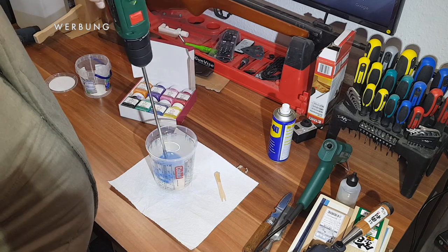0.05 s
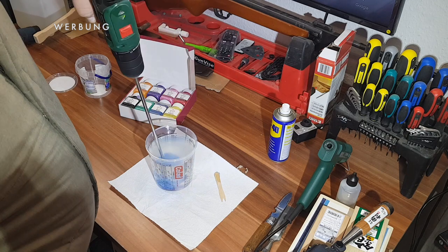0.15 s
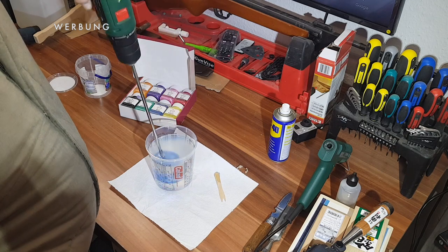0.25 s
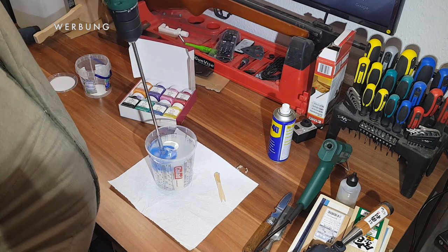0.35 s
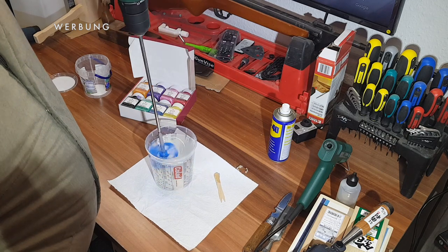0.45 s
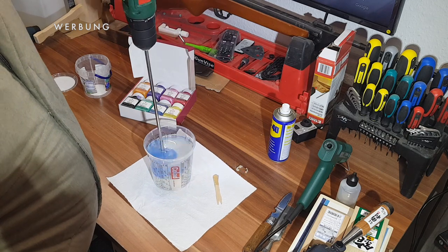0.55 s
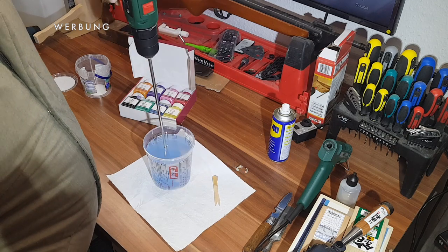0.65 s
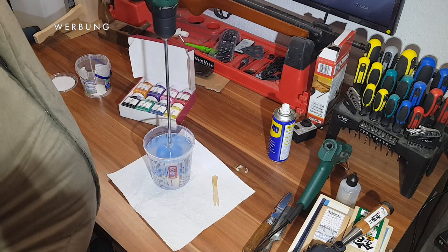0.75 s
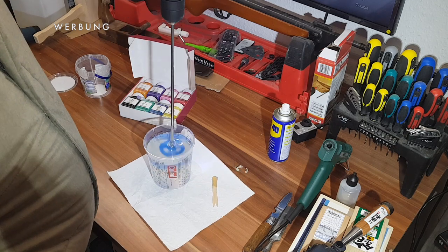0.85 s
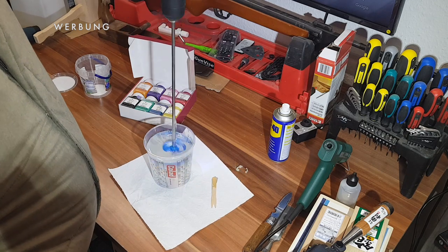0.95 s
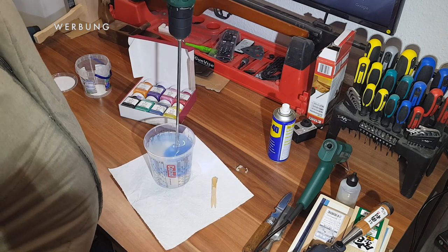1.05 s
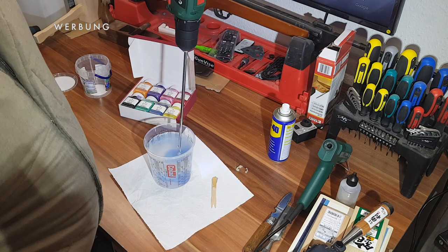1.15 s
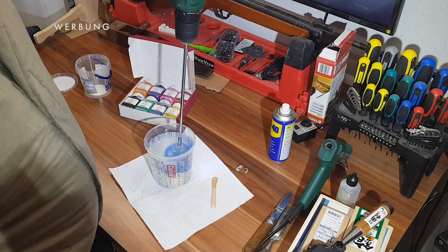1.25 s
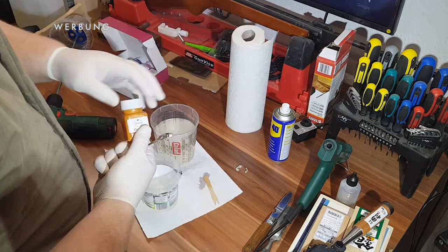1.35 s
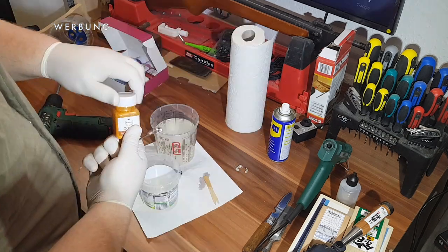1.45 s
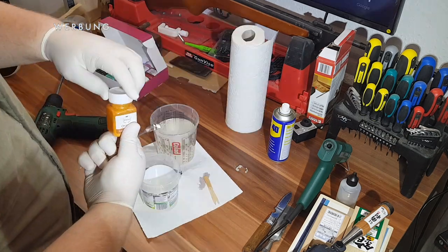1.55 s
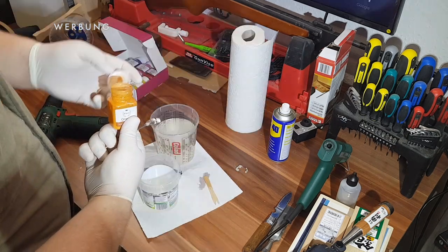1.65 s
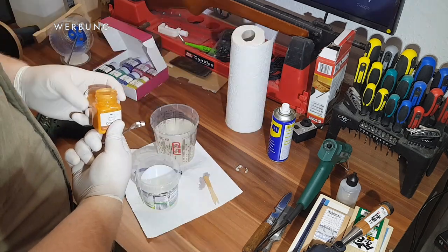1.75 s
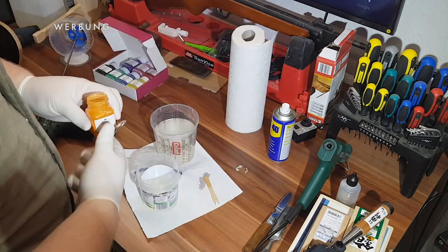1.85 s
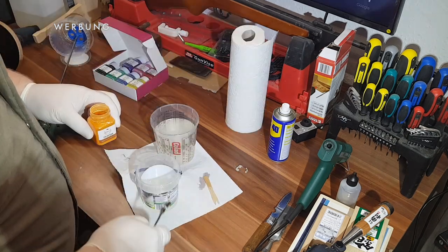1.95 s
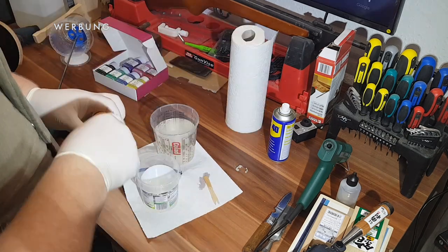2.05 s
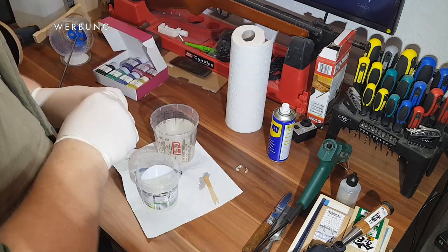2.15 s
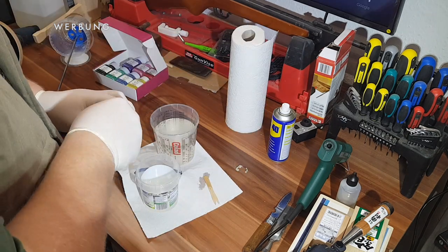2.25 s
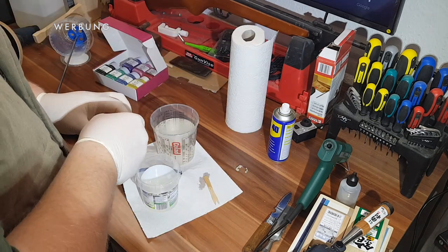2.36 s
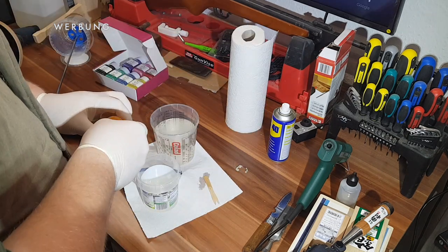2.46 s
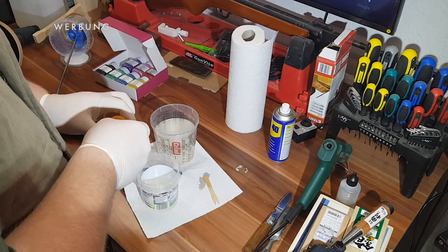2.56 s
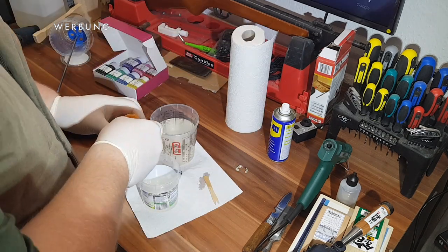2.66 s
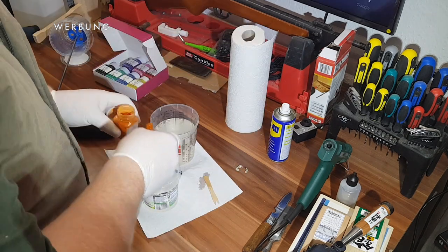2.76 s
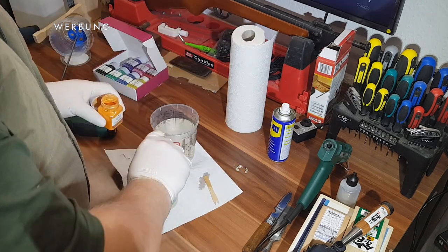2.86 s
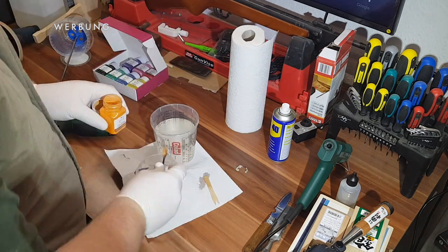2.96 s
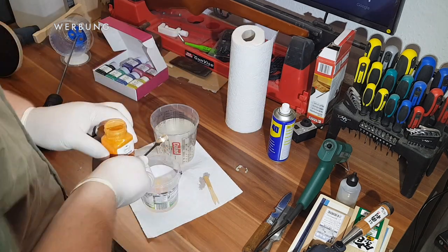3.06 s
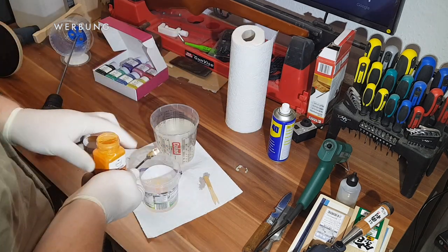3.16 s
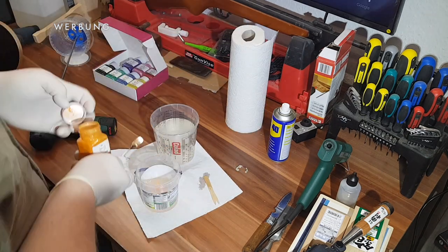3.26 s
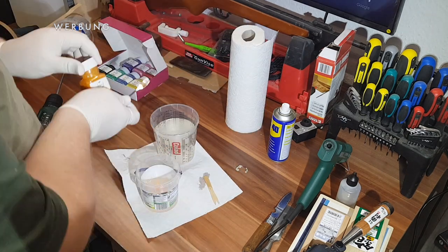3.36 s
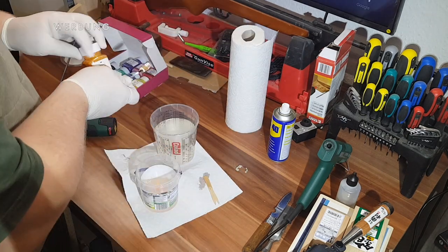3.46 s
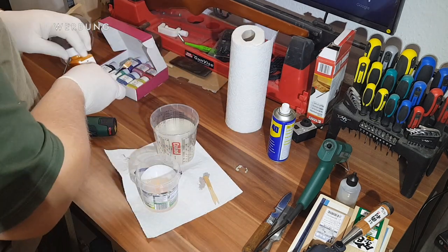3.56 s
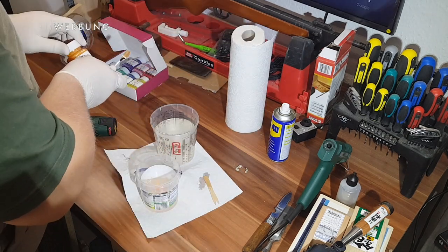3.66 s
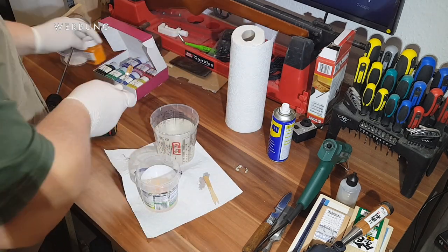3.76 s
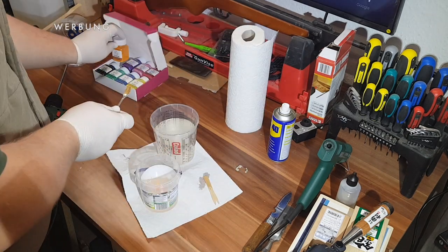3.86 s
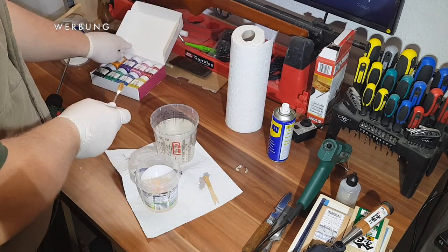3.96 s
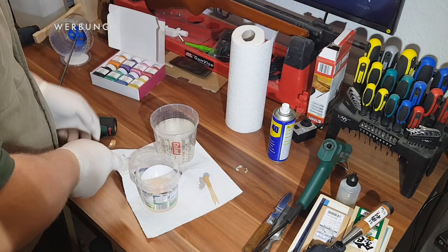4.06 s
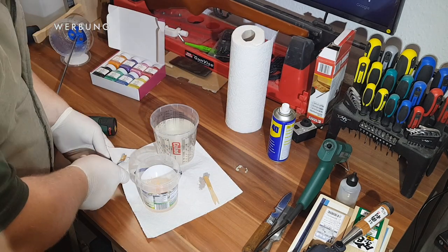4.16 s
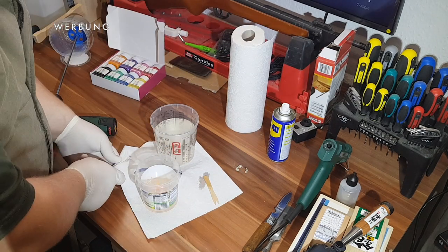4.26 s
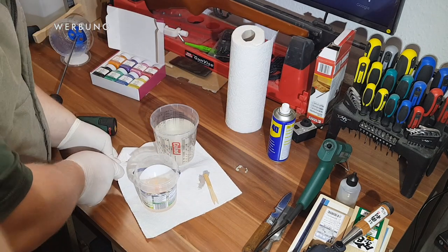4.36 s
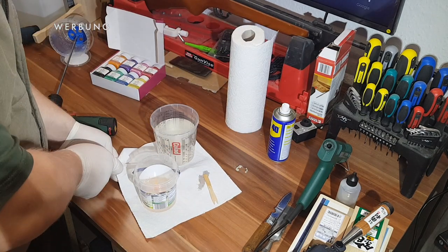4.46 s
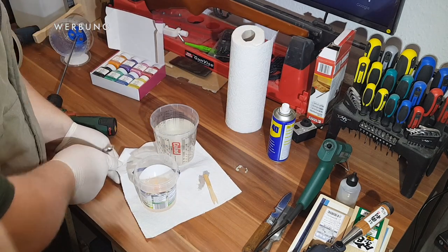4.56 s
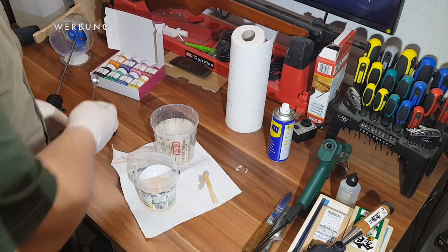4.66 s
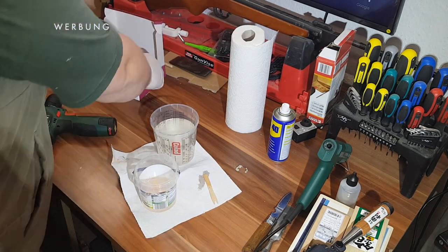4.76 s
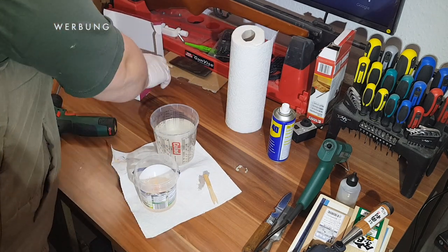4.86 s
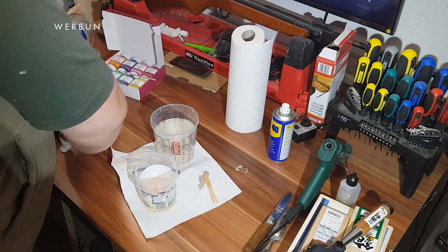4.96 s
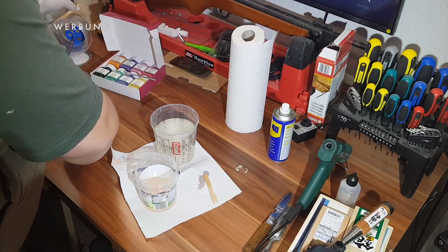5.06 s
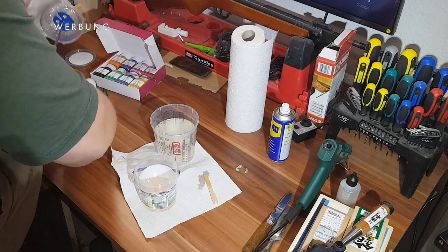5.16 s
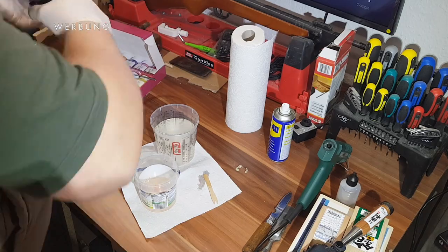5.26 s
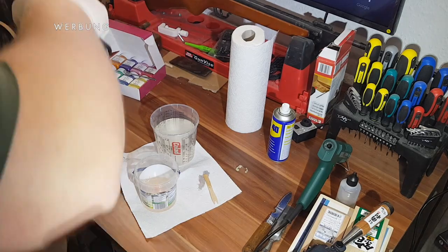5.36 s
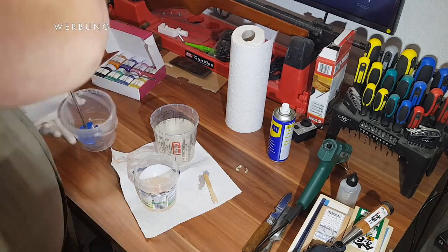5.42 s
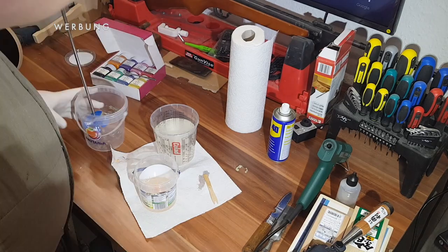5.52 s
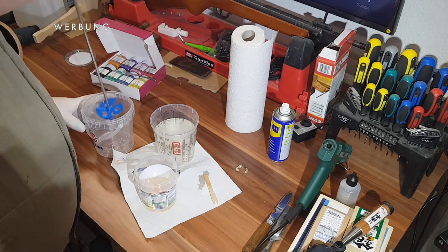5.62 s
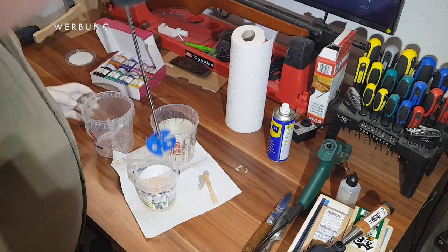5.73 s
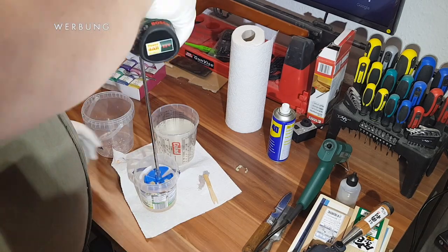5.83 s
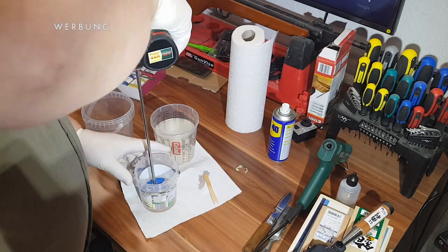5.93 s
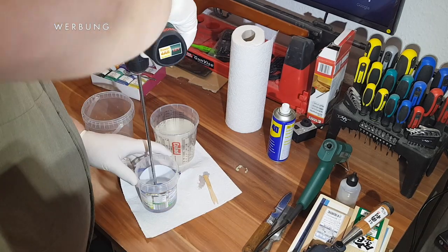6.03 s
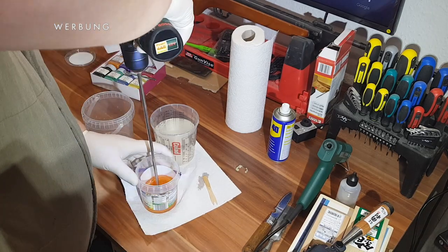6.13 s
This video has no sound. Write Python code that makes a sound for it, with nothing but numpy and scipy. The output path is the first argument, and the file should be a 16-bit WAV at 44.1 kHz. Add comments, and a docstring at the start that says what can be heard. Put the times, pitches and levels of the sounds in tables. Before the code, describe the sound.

A handheld stereo device sits near a wooden bench in a small, dry workshop. First a drill spins a stirring rod, hissing and whining evenly with a few soft bumps, then cuts out. Faint room murmur, hum and treble hiss remain under light clicks and taps of jars and tools. Late on, a rod raps sharply inside an empty plastic cup, before two clicks and a very short motor chirp.

```python
"""A cordless drill stirs resin in a plastic cup on a wooden bench, stops dead, and is blipped again at the end.
The drill is gear-tooth tones over shaped noise; its blip adds a sliding squeal.
Cups, a jar and tools knock and click: each contact mixes ringing cup tones with a short crack of noise.
Behind them lie a room murmur and a faint appliance hum, made of noise and of steady tones.
A phone stands close: its two ports agree mostly in the bass, and the left port has a hiss of its own."""
import sys
import numpy as np
from scipy import signal
from scipy.fft import rfft, irfft, next_fast_len
from scipy.io import wavfile
from scipy.ndimage import uniform_filter1d

SR = 44100
rng = np.random.default_rng(int(sys.argv[2]) if len(sys.argv) > 2 else 0)


def dump(signal):
    """Clip the signal to [-1, 1] and save it as 16-bit WAV at the path in sys.argv[1]."""
    limited = np.clip(np.atleast_2d(signal).T, -1, 1)
    pcm = np.round(limited * 32767).astype(np.int16)
    wavfile.write(sys.argv[1], SR, pcm)


N = 272979
T = np.arange(N) / SR  # time in seconds

# The drill while stirring. Each row: time in seconds, then levels in dB of the hiss,
# of the 3rd multiple of the gear pitch, and of the 9th multiple.
STIRRING = [(0.0, -37.5, -53.5, -55), (0.15, -38.5, -48, -64), (0.33, -39.5, -45.5, -55),
            (0.48, -38.5, -51.5, -56), (0.6, -37.5, -60.5, -61), (0.67, -38, -46.5, -52),
            (0.76, -38.5, -50, -56), (0.84, -38.5, -58, -65), (1.0, -38, -50.5, -59),
            (1.15, -37.5, -51.5, -46), (1.35, -38, -51, -55)]
# How hard the rod is loaded. Each row: time in seconds, load from 0 to 1.
ROD_LOAD = [(0.6, 0.3), (0.68, 0.65), (0.95, 1), (1.35, 0.4)]
# The trigger blip. Each row: time in seconds, gear pitch in Hz, then levels in dB of the hiss,
# of the tone at the gear pitch, and of its 3rd multiple.
TRIGGER_BLIP = [(6.101, 746, -38.5, -74, -77), (6.121, 1200, -37, -72, -67),
                (6.136, 1390, -37.5, -59, -46.5), (6.147, 1474, -34, -46, -54),
                (6.171, 1386, -38.5, -76, -70), (6.19, 1090, -53, -74, -71)]
# Weaker gear tones. Each row: multiple of the gear pitch, level in dB against the hiss.
WEAK_GEAR_TONES = [(.985, -27), (4, -37), (5, -20), (6, -21.5), (7.32, -35)]
# Squeal as the motor starts. Each row: time in seconds, pitch in Hz, level in dB.
START_SQUEAL = [(6.113, 9500, -62), (6.121, 12100, -47), (6.129, 15400, -45), (6.137, 15600, -56)]
# Colour of the brush and fan hiss. Each row: frequency in Hz, relative strength in dB per Hz.
BRUSH_COLOUR = [(60, -35.5), (190, -28), (400, -25), (700, -20.5), (1350, -16), (2600, -11.5),
                (3300, -11.5), (4600, -5), (6500, -1.5), (9300, -4), (12500, -2.5), (13500, -4),
                (15600, -3), (16000, -44)]
# Resonances of bench and drill shell. Each row: frequency in Hz, width in Hz, boost in dB.
SHELL_RESONANCES = [(458, 48, 14), (7720, 410, 5), (11370, 1160, 8), (13200, 400, 5)]
# Where the drill sits. Each row: time in seconds, left minus right in dB.
DRILL_SIDE = [(.2, 1), (1., 0.5), (6.1, 0)]
STIR_STOP_S = 1.357
MESH_HZ, MESH_DRIFT_HZ = 1694.7, 0.502  # gear teeth meeting while stirring, and how far that wanders
FIRST_DB, FIRST_LOAD_DB = -71, 12.5  # tone at the gear pitch: unloaded level, rise at full load
SECOND_DB, SECOND_LOAD_DB = -62, 5.5  # the same for the 2nd multiple
BLIP_SECOND_NINTH_DB = -23.5  # 2nd and 9th multiples against the hiss during the blip


def follow(table):
    """Draw straight lines between the rows of a table: one curve over time for each column after the first."""
    seconds, *columns = np.transpose(table)
    return [np.interp(T, seconds, column) for column in columns]


def drill():
    """Meeting gear teeth give tones at multiples of one pitch, over brush and fan hiss, while the trigger is held."""
    blip = T > TRIGGER_BLIP[0][0]
    stir_hiss, stir_third, stir_ninth = follow(STIRRING)
    load, = follow(ROD_LOAD)
    blip_hz, blip_hiss, blip_first, blip_third = follow(TRIGGER_BLIP)
    mesh_hz = np.where(blip, blip_hz, MESH_HZ + MESH_DRIFT_HZ * walk(8))
    hiss_db = np.where(blip, blip_hiss, stir_hiss)

    # load on the rod brings up the two lowest multiples
    blip_second_ninth = blip_hiss + BLIP_SECOND_NINTH_DB
    first = np.where(blip, blip_first, FIRST_DB + FIRST_LOAD_DB * load)
    second = np.where(blip, blip_second_ninth, SECOND_DB + SECOND_LOAD_DB * load)
    third = np.where(blip, blip_third, stir_third)
    ninth = np.where(blip, blip_second_ninth, stir_ninth)
    lines = [(1, first), (2, second), (3, third), (9, ninth)]
    lines += [(multiple, hiss_db + db) for multiple, db in WEAK_GEAR_TONES]

    # loose teeth chatter during the blip: pitch and level shake more
    chatter = np.where(blip, 3.0, 1.0)
    whine = 0
    for multiple, db in lines:
        waver = 0.31 * np.sqrt(multiple) + 0.35 * (chatter - 1)
        flutter_db = 1.8 * walk(30.05) + 1.83 * chatter * walk(500)
        whine = whine + tone(multiple * mesh_hz, db, waver, flutter_db)

    air = hiss(BRUSH_COLOUR, SHELL_RESONANCES, alike_hz=2900, like=0.91, flicker_db=1.5, grain_db=1.5)
    air = undb(hiss_db) * air

    seconds, squeal_hz, squeal_db = np.transpose(START_SQUEAL)
    squeal_level = np.interp(T, seconds, squeal_db, -120, -120)  # next to silent outside the table
    squeal = tone(np.interp(T, seconds, squeal_hz), squeal_level, waver=0.3, flutter_db=3.5 * walk(500))

    held = uniform_filter1d(1.0 * ((T < STIR_STOP_S) | blip), size=88)  # 2 ms on and off ramps
    side_db, = follow(DRILL_SIDE)
    return held * pan(side_db) * (whine + air + squeal)


# The four tables of contacts share their columns. Each row: start in seconds, level in dB before the
# colour of its kind, hardness in dB per band above the loudest band, weight in dB per band below it,
# time in seconds for the lingering noise to fade by 60 dB, rise in milliseconds.
# Dull thuds of rod and cups into the bench, in those columns.
BENCH_THUDS = [(0.167, -49.5, 2, -2, 0.27, 12), (0.208, -46.5, 1.5, -6, 0.23, 5.2),
               (0.668, -38.5, -1.5, -4, 0.095, 1.9), (1.15, -54, -8, 7, 0.26, 6.8),
               (1.189, -48.5, 0, 5, 0.1, 4.9), (3.008, -68, 2.5, -2, 0.061, 2.6),
               (3.106, -65.5, 1.5, 1, 0.065, 1.4), (3.654, -78, -2, 20, 0.18, 9.6),
               (3.869, -50, 2, -3, 0.068, 2.3), (3.8926, -47, 0.5, -9, 0.051, 1.8),
               (3.906, -46, 0, -7, 0.051, 2.2), (3.929, -53, 3, -2, 0.21, 2.5),
               (4.843, -54.5, -5, -12, 0.12, 3), (4.865, -50.5, -8, -4, 0.058, 3.7),
               (4.9742, -50.5, -2, 3.5, 0.12, 1.9), (5.006, -51, -5, -3, .11, 3),
               (5.4102, -35.5, 0.5, -2, 0.076, 1.7), (5.648, -34.5, -7.5, 1.5, 0.095, 4.3)]
# Broad clatter of box, jars and tools, with faint slow rustles near 5.9 s, in those columns.
CLATTER_AND_RUSTLES = [(3.083, -65.5, -9, 1.5, .099, 0.71), (3.252, -57.5, 4, -1, 0.089, 16.6),
                       (3.4107, -43.5, 4, -1.5, 0.086, 0.91), (3.8112, -41.5, -3, -2, 0.14, 0.49),
                       (3.846, -48.5, 3, 4, 0.062, 1.6), (3.9567, -32.5, 4.5, 1.5, 0.076, 0.4),
                       (3.981, -29.5, -2.5, -0.5, 0.08, 0.55), (4.989, -52, -3.5, 2.5, .091, 4.3),
                       (5.213, -61.5, -9, 0.5, 0.055, 3.1), (5.479, -53, -1.5, 3, 0.078, 3.8),
                       (5.598, -31.5, 1, -3, 0.087, 0.75), (5.871, -72, -1.5, -5, 0.22, 15),
                       (5.939, -70, -9, 2, 0.13, 13), (6.1, -45.5, -6, 5, 0.41, 0.57)]
# Thin bright clicks, the first just as the drill stops, in those columns.
THIN_CLICKS = [(1.366, -62, 7, -4, .04, .57), (1.479, -67, -1, 1, 0.22, 2.2),
               (1.5542, -62, 7, 3.5, 0.09, 0.52), (1.6151, -53.5, -1, -2, 0.071, 4.1),
               (1.8732, -71.5, 8.5, 5.5, 0.086, .83), (2.1646, -60, 1, 1.5, .071, 0.27),
               (2.877, -40, -1.5, 0, 0.081, 2.2), (3.0336, -56, 1, 0, 0.082, 1.6),
               (3.348, -43, -4, -6, 0.028, 0.73), (3.353, -44.5, -4, -8, 0.076, 1.7),
               (3.498, -65, 8, -2, 0.089, 1.1), (3.801, -57, 1, 1, 0.13, 2.2),
               (3.909, -49, -1, -11, .063, 1.7), (4.406, -50.5, 3, -4, 0.096, 0.32),
               (4.776, -30, -2.5, -1.5, 0.086, 0.61), (4.843, -52.5, -6, -2, 0.1, 4),
               (4.865, -54.5, 2, -3, 0.042, 3.3), (5.096, -59.5, 7, -4, 0.064, 2.1),
               (5.107, -52.5, 5, -2, 0.063, 0.89), (5.1265, -46.5, 6, -1.5, 0.074, .3),
               (5.347, -58, -2, 1, 0.16, 3.5), (5.411, -46.5, 4, -7.5, 0.084, 1.2),
               (6.0995, -48.5, 12, 2, 0.023, 0.17), (6.1617, -33, -3, -0.5, .04, 0.58),
               (6.1696, -37, 5, -0.5, 0.046, 0.18)]
# Ringing rattle of the rod against an empty cup, in those columns.
ROD_RATTLES = [(4.219, -63.5, -1, 4, .13, 3.2), (5.075, -65, -5, 8, 0.17, 7.7), (5.092, -57, -12, 1, .1, 4),
               (5.106, -54.5, -14, 0, 0.088, 1.5), (5.13, -41, -9, 1.5, 0.071, 2.1),
               (5.161, -52.5, 0, 3, 0.078, 1.7), (5.2, -57.5, 8.5, 0, .07, 0.28),
               (5.412, -38, -2, 1, .08, 2), (5.4294, -19, 7.5, -1, 0.057, 0.22),
               (5.441, -35, 9, 6, 0.098, 1.4), (5.501, -37, -5.5, 1.5, 0.077, 2.5),
               (5.5333, -38.5, -13, 0, 0.092, 1.7), (5.559, -37, -4, -2, 0.056, 2.8),
               (5.575, -26, 0.5, -3, 0.072, .34), (5.593, -36, 9, 2, 0.024, 1.9)]
# Sound of a thud: list of levels in dB for the seven bands, share of ringing from 0 to 1, left minus right in dB.
THUD_KIND = ([-13.5, 0, -7.5, -10, -13, -15.5, -24], 0.36, 0.7)
# Sound of clatter: the same three entries.
CLATTER_KIND = ([-24, -7, -2.5, 0, -2, -5.5, -8], 0.37, 1.5)
# Sound of a click: the same three entries.
CLICK_KIND = ([-34, -19.5, -12.5, -5, -1, -3.5, -6.5], 0.32, 3)
# Sound of a rattle: the same three entries.
RATTLE_KIND = ([-37.5, -22, -11.5, 0, -4, -23.5, -23], 0.81, 1.7)
# Band number, from 0, where hardness and weight pivot: one entry each for thuds, clatter, clicks, rattles.
PIVOT_BAND = [1, 3, 4, 3]
# How many bands above the pivot hardness keeps adding: one entry each for the same four kinds.
HARDNESS_REACH = [5, 3, 2, 1]


def contacts():
    """List every contact with its seven band levels: hardness tips them in the treble, weight in the bass."""
    tables = (BENCH_THUDS, CLATTER_AND_RUSTLES, THIN_CLICKS, ROD_RATTLES)
    kinds = (THUD_KIND, CLATTER_KIND, CLICK_KIND, RATTLE_KIND)
    for rows, (colour_db, ring, pan_db), pivot, reach in zip(tables, kinds, PIVOT_BAND, HARDNESS_REACH):
        bands_up = np.arange(len(colour_db)) - pivot
        for start, db, hard_db, weight_db, t60, rise_ms in rows:
            treble_tip = hard_db * np.clip(bands_up, 0, reach)
            bass_tip = weight_db * np.maximum(-bands_up, 0)
            band_db = db + np.array(colour_db) + treble_tip + bass_tip
            yield start, band_db, t60, pan_db, rise_ms, ring


# Ringing tones of a cup. Each row: central pitch in Hz, central relative level in dB,
# time in seconds to fade by 60 dB when the contact's own fade time is 0.068 s.
CUP_TONES = [(210.6, -7.5, 0.037), (471.7, -6, 0.062), (578, -20, 0.062), (1147, -8, 0.045),
             (1554, -24.5, 0.2), (1845, -13.5, 0.08), (1888, 4.5, 0.042), (2073, -0.5, 0.062),
             (3150, -5.5, 0.095), (3320, -3.5, 0.077), (3380, -3.5, 0.051), (3960, -6.5, 0.072),
             (4060, -12, 0.11), (5330, -26, 0.011), (6142, -43, .06), (8060, -44.5, .05),
             (10900, -22.5, 0.066), (12000, -33, 0.036)]
# Edges between the seven frequency bands, low to high: one column in Hz.
BAND_EDGES = [180, 350, 700, 1500, 2600, 5500, 11000, 15700]
# How alike left and right crack in each band: one column, from 0 (unrelated) to 1 (the same).
BAND_LIKENESS = [0.88, 0.9, 0.95, .92, 0.11, 0.11, .1]
# How far each band rings rather than rustles: one column, a factor on the ring share of the kind.
BAND_RINGING = [0.91, 1.74, 0.82, 0.95, 0.93, 0.36, 0.9]
TAIL_SHARE, SNAP = 0.65, 9.5  # part of a crack that lingers; how much faster the rest dies
KNOCK_SAMPLES = 5000


def knocks():
    """Each contact rings the cup's tones and scatters a crack of noise, mixed and levelled band by band."""
    out = np.zeros((2, N + KNOCK_SAMPLES))
    t = np.arange(KNOCK_SAMPLES) / SR
    hz, tone_db, tone_t60 = np.transpose(CUP_TONES)[:, :, None]
    filters = [signal.butter(3, edges, "bandpass", fs=SR, output="sos")
               for edges in zip(BAND_EDGES, BAND_EDGES[1:])]
    for start, band_db, t60, pan_db, rise_ms, ring in contacts():
        # the decay starts once the contact is full, then falls ever faster to a short, abrupt end
        after = np.maximum(t - rise_ms / 1000, 0)
        rise = 1 - np.exp(-(1000 * t / max(rise_ms, 0.05)) ** 2)
        rise = rise * np.exp(-(after / (0.76 * t60)) ** 4)

        # contacts with a shorter crack have shorter ringing too
        fade = np.exp(-np.log(1000) * after / (tone_t60 * t60 / 0.068))
        pitch_chance, apart_chance, level_chance = rng.standard_normal((3, len(CUP_TONES), 1))
        swing = 2 * np.pi * hz * (1 + 0.016 * pitch_chance) * t
        strength = undb(tone_db + 2.0 * level_chance) * fade
        # high tones reach the two ports out of step
        apart = (1.4 + 0.39 * apart_chance) * np.minimum(hz / 3000, 1) ** 4
        ringing = np.array([np.sum(strength * np.sin(swing + sign * apart), axis=0) for sign in (1, -1)])

        tail = np.exp(-np.log(1000) * after / t60)
        push = rise * (TAIL_SHARE * tail + (1 - TAIL_SHARE) * tail ** SNAP)
        at = int(start * SR)
        for sos, db, like, tonal in zip(filters, band_db, BAND_LIKENESS, BAND_RINGING):
            crack = signal.sosfilt(sos, pair(KNOCK_SAMPLES, like) * push)
            band_ring = signal.sosfilt(sos, ringing * rise)
            share = np.clip(tonal * ring, 0, 1)
            blow = share * unit(band_ring) + (1 - share) * unit(crack)
            out[:, at:at + KNOCK_SAMPLES] += undb(db) * pan(pan_db)[:, None] * unit(blow)
    return out[:, :N]


# Workshop murmur, swelling as sleeves and gloves move. Each row: time in seconds, level in dB before panning.
MURMUR_LEVEL = [(1.4, -75), (2.19, -75.5), (2.92, -75), (3.24, -70), (3.54, -75), (4.03, -73), (4.45, -76),
                (4.85, -69), (5.0, -75), (5.13, -72), (5.43, -70.5), (5.54, -63), (5.69, -73.5),
                (6.08, -72.5)]
# Colour of the murmur. Each row: frequency in Hz, relative strength in dB per Hz.
MURMUR_TINT = [(30, -50.5), (90, -43), (190, -9.5), (560, -9.5), (1200, -15.5), (2100, -14), (2600, -17),
               (6000, -22.5), (15200, -24), (16300, -46)]


def murmur():
    """Broad noise, strongest in the low middle, whose level swells and sinks."""
    level_db, = follow(MURMUR_LEVEL)
    noise = hiss(MURMUR_TINT, [], alike_hz=2480, like=0.42, flicker_db=3.5, grain_db=2.0)
    return pan(1.0)[:, None] * undb(level_db) * noise


# Appliance hum. Each row: pitch in Hz, central level in dB before panning.
HUM_TONES = [(576.0, -87), (1152, -83.5), (1443, -92), (1728, -92.5), (2019, -88)]


def appliance_hum():
    """A few steady pitches whose level and phase wander slightly, stronger on the left."""
    hum = 0
    for hz, db in HUM_TONES:
        level = np.sqrt(2) * undb(db + 1.6 * walk(12))
        hum = hum + level * np.sin(2 * np.pi * hz * T + 0.3 * walk(8) + rng.uniform(0, 2 * np.pi))
    return pan(3.2)[:, None] * hum


# Colour of the hiss in the left port. Each row: frequency in Hz, relative strength in dB per Hz.
LEFT_COLOUR = [(5600, -38), (6500, -13), (7600, -3.5), (9900, -2), (11300, -10), (12600, -29.5),
               (13500, -44.5)]
LEFT_HISS_DB = -62.5


def left_port_hiss():
    """Nearly steady treble noise in the left port alone."""
    noise = hiss(LEFT_COLOUR, [], alike_hz=1000, like=0, flicker_db=0.3, grain_db=0)
    left = undb(LEFT_HISS_DB) * noise[0]
    return np.array([left, 0 * left])


def hiss(colour, resonances, alike_hz, like, flicker_db, grain_db):
    """Coloured noise of rms 1 in bands 2/3 octave apart that flicker alone; the ports drift apart above alike_hz."""
    size = next_fast_len(N)
    f = np.maximum(np.fft.rfftfreq(size, 1 / SR), 1)
    colour_hz, colour_db = np.transpose(colour)
    gain = undb(np.interp(np.log(f), np.log(colour_hz), colour_db))
    for hz, width, db in resonances:
        gain = gain * (1 + (undb(db) - 1) / (1 + (2 * (f - hz) / width) ** 2))
    grains = undb(grain_db * rng.exponential(size=N))  # uneven samples make the noise grainy
    mid, side = rfft(rng.standard_normal((2, N)) * grains, size)
    share = np.clip(like, 0, 1) / (1 + (f / alike_hz) ** 4)
    ears = gain * (np.sqrt(1 + share) * mid + np.sqrt(1 - share) * side * np.array([[1], [-1]]))
    steps = 1.5 * np.log2(f / 60)
    out = 0
    for k in range(-1, 14):
        band = np.maximum(1 - np.abs(steps - k), 0)  # triangles that overlap their neighbours
        out = out + undb(flicker_db * walk(9)) * irfft(ears * band, size)[:, :N]
    return out / np.sqrt(np.mean(out ** 2))


def tone(hz, db, waver, flutter_db):
    """A tone whose phase (waver, radians) and level wander; at high pitch the ports hear it out of step."""
    wander = waver * (walk(40) + 0.56 * walk(400))
    phase = 2 * np.pi * np.cumsum(hz) / SR + wander + rng.uniform(0, 2 * np.pi)
    side = np.minimum(hz / 4000, 1) ** 2 * (0.92 * np.sin(phase + 0.6 + 0.5 * walk(5.2)))
    return np.sqrt(2) * undb(db + flutter_db) * (np.sin(phase) + np.array([side, -side]))


def pair(size, like):
    """Two noises with the given likeness, from a shared part and an opposed part."""
    like = np.clip(like, 0, 1)
    mid, side = rng.standard_normal((2, size))
    return np.sqrt((1 + like) / 2) * mid + np.sqrt((1 - like) / 2) * side * np.array([[1], [-1]])


def walk(rate):
    """Random levels, each held 1 / rate seconds and then smoothed twice; spread near 1."""
    k = int(SR / rate)
    held = np.repeat(rng.standard_normal(N // k + 1), k)
    return 1.224 * uniform_filter1d(uniform_filter1d(held, k), k)[:N]


def unit(x):
    """Scale so that twice the mean power of the ports, averaged over 2 ms, peaks at 1."""
    return x / np.sqrt(2 * uniform_filter1d(np.mean(x ** 2, axis=0), size=88).max())


def undb(db):
    """Turn dB into a plain amplitude factor."""
    return 10 ** (np.asarray(db) / 20)


def pan(db):
    """Left and right gains for a left minus right difference in dB."""
    return undb(np.array([db, -db]) / 2)


def scene():
    """The drill, the knocks and the background, added together."""
    return drill() + knocks() + murmur() + appliance_hum() + left_port_hiss()


TOP_HZ = 16550


def record(dry):
    """The phone cuts the top: a steep low-pass filter."""
    return signal.sosfilt(signal.ellip(16, 0.2, 80, TOP_HZ, fs=SR, output="sos"), dry)


dry = scene()
out = record(dry)
dump(out)
```